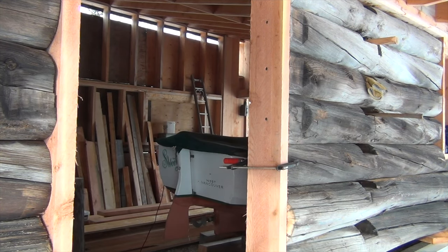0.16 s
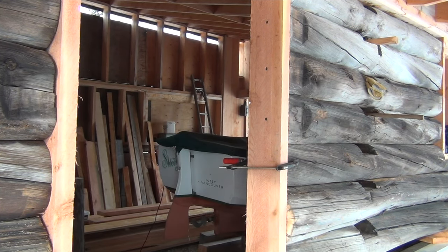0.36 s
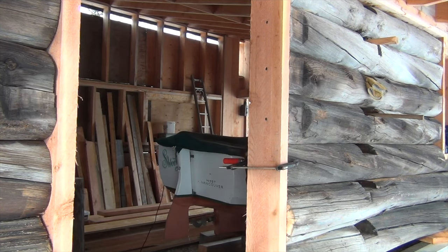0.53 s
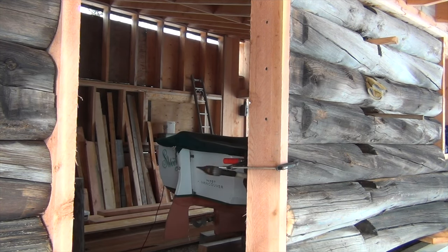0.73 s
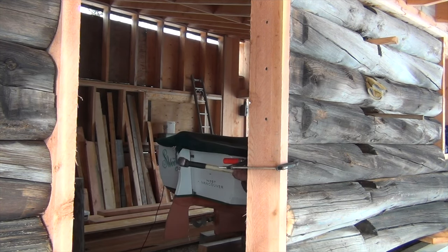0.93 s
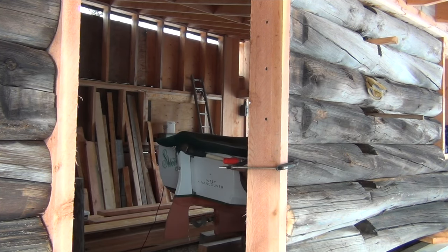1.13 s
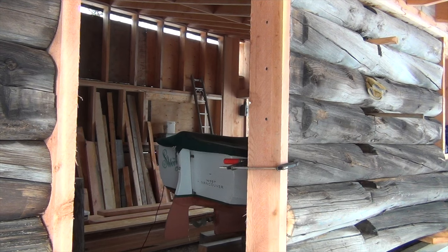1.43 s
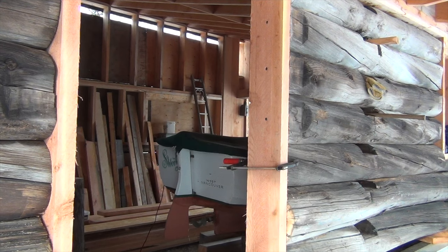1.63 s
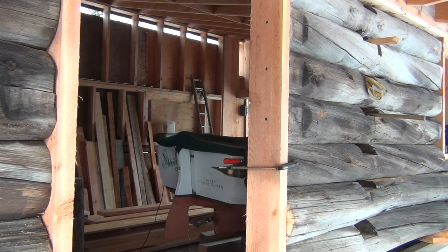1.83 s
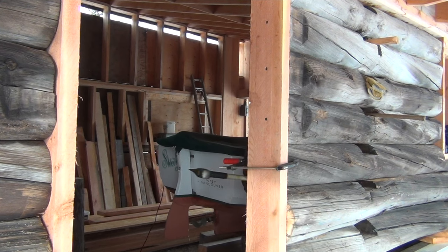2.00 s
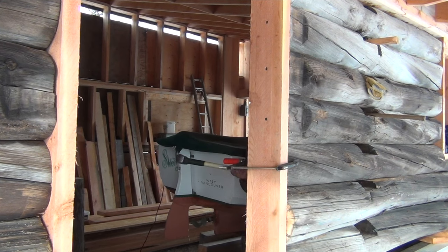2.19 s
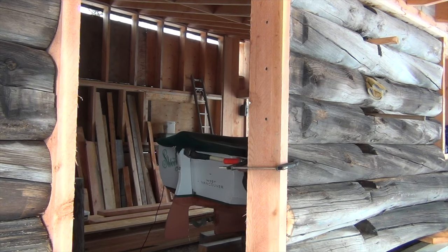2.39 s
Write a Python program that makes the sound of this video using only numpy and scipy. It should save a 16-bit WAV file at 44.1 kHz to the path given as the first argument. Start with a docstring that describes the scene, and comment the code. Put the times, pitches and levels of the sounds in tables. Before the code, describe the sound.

A sledgehammer hits the log wall of a shed twice. Each deep thud leaves the timbers humming and loose things rattling inside. Small clicks, a hollow wooden knock and a faint metallic squeak come between the blows, in quiet outdoor air.

```python
"""Sledgehammer on a log shed

Two blows strike the wall. Each gives a loud thud, held nearly level for a fifth of a second as by a
limiter, then dying away while the timbers hum. Loose things inside rattle, then clatter again as the
wall rocks back. Around the blows: small clicks, one hollow wooden knock, soft scuffs and a thin
squeak, as of metal rubbing."""
import sys
import numpy as np
from scipy.fft import rfft, irfft, next_fast_len
from scipy.io import wavfile
from scipy.ndimage import map_coordinates

SR = 44100
rng = np.random.default_rng(int(sys.argv[2]) if len(sys.argv) > 2 else 0)


def dump(signal):
    """Clip the signal to [-1, 1] and save it as 16-bit WAV at the path in sys.argv[1]."""
    limited = np.clip(np.atleast_2d(signal).T, -1, 1)
    pcm = np.round(limited * 32767).astype(np.int16)
    wavfile.write(sys.argv[1], SR, pcm)


N = 112454
T = np.arange(N) / SR


def amp(db):
    """Decibels to gain."""
    return 10 ** (np.asarray(db) / 20)


def unit_rms(x):
    """Scale to rms 1."""
    return x / np.sqrt(np.mean(x ** 2) + 1e-20)


def log_interp(points, hz):
    """Interpolate (frequency [Hz], value) points on a log axis."""
    freqs, values = np.transpose(points)
    return np.interp(np.log(hz + 1), np.log(freqs + 1), values)


def wobble(rate_hz):
    """Smooth random curve, rate_hz knots a second."""
    return map_coordinates(rng.standard_normal(N // 4), [T * rate_hz], mode="mirror")


def filtered(x, response):
    """Apply a frequency response."""
    size = next_fast_len(N + SR // 4)
    return irfft(rfft(x, size) * response(np.fft.rfftfreq(size, 1 / SR)), size)[..., :N]


# left-right likeness (frequency [Hz], coherence [0..1])
COHERENCE = [(30, 0.86), (130, 0.94), (350, 0.96), (700, 0.9), (1400, 0.94), (2400, 0.92), (4000, 0.94),
             (7000, 0.83), (10500, 0.97), (15000, 1)]

def noise(spectrum, tilt_db=0, coherence=COHERENCE):
    """Coloured stereo noise of rms 1, tilted by tilt_db an octave above about 1 kHz."""
    def colour(hz):
        angle = np.arccos(np.clip(log_interp(coherence, hz), -1, 1)) / 2
        gain = amp(log_interp(spectrum, hz) + tilt_db * np.log2(hz / 1000 + 1))
        return gain * [np.cos(angle), np.sin(angle)]
    mid, side = filtered(rng.standard_normal((2, N)), colour)
    return unit_rms(np.array([mid + side, mid - side]))


def envelope(start_s, attack_s, fall_db_per_s, hold_s=0, sag_db_per_s=0):
    """Attack, sagging hold, exponential release."""
    t = np.maximum(T - start_s, 0)
    drop_db = sag_db_per_s * np.minimum(t, hold_s) + fall_db_per_s * np.maximum(t - hold_s, 0)
    return (1 - np.exp(-t / attack_s)) * amp(-drop_db)


def ring(modes, start_s, attack_s, drift_rad):
    """Damped modes with wandering phase."""
    return sum(amp(db) * envelope(start_s, attack_s, 60 / t60)
               * np.sin(2 * np.pi * (hz * T + rng.random()) + drift_rad * wobble(14))
               for hz, db, t60 in modes)


# hammer blows (time [s], level [dB])
HAMMER_BLOWS = [(0.2045, -21.5), (1.468, -21.5)]
# spectra of hammer crack, wall thud, shed boom (frequency [Hz], relative density [dB])
CRACK_SPECTRUM = [(90, -33), (220, -1), (600, -1), (1000, -3.5), (1500, -12.5), (2500, -23.5), (5000, -31),
                  (9000, -29.5), (12000, -27), (15500, -38)]
THUD_SPECTRUM = [(20, -12), (45, -9), (70, -9.5), (98, -13.5), (125, -1.5), (170, 2.5), (240, 0.5),
                 (310, -5.5), (430, -0.5), (650, -8), (900, -15), (1300, -21.5), (2300, -31.5), (5000, -47),
                 (15000, -57)]
BOOM_SPECTRUM = [(25, -11), (70, -8.5), (100, -4.5), (155, -3.5), (250, -6), (470, -1.5), (650, -9),
                 (1000, -10.5), (2000, -19), (4000, -24.5), (8000, -31), (15000, -52)]
# timber modes (frequency [Hz], relative level [dB], t60 [s])
TIMBER_MODES = [(84.3, -26.5, 3.7), (120, -19, 1.75), (153.5, -18.5, 2.8), (171.6, -12.5, 1.38),
                (229, -21.5, 2.87), (342, -24.5, 2.9), (403, -25, 2.1), (419.7, -10.5, 1.04),
                (434, -19, 2.23), (475, -18, 1.2), (514.5, -18, 2.66), (549, -20.5, 2.3), (743, -46, 2.1),
                (936, -17.5, 1.39)]

def wall():
    """Each blow draws the same answer: crack, held thud, low echo, rock back, timber hum."""
    crack = amp(-2) * noise(CRACK_SPECTRUM) * envelope(0, 0.00034, 300, hold_s=0.006)
    thud = noise(THUD_SPECTRUM) * envelope(0, 0.005, 132, hold_s=0.2, sag_db_per_s=27.5)
    hum = amp(-1) * ring(TIMBER_MODES, 0, attack_s=0.012, drift_rad=0.88)
    echo = amp(-11.5) * noise(BOOM_SPECTRUM, tilt_db=-2.5) * envelope(0, 0.033, fall_db_per_s=28)
    rock_back = amp(-12.5) * noise(BOOM_SPECTRUM, tilt_db=1.5) * envelope(0.4, 0.048, 83.5)
    answer = crack + thud + hum + echo + rock_back
    return sum(amp(db) * np.pad(answer, ((0, 0), (round(s * SR), 0)))[:, :N] for s, db in HAMMER_BLOWS)


# loose things landing (time [s], level [dB])
LANDINGS = [(0.227, -30.5), (0.245, -29), (.268, -29.5), (0.286, -25), (.339, -24.5), (.372, -32.5),
            (.405, -37.5), (0.5895, -36.5), (0.666, -36), (.695, -46), (.745, -46), (.838, -51),
            (1.488, -27), (1.537, -26), (1.556, -34), (1.593, -25), (1.611, -30), (1.66, -30), (1.85, -35),
            (1.934, -37), (1.991, -41), (2.034, -47)]
# their contact spectra (frequency [Hz], relative density [dB])
BUZZ_SPECTRUM = [(1000, -9), (2400, -10), (4000, 2), (6500, -1), (8300, -5), (9800, -5), (12500, -14.5),
                 (14500, -23), (15800, -36)]
CLATTER_SPECTRUM = [(300, -2.5), (550, 5), (900, -2.5), (1600, -3.5), (2500, -7), (3200, 0.5), (4000, -0.5),
                    (5000, -2.5), (5800, -8.5), (7000, -11.5), (8500, -19.5), (10000, -21), (15000, -40)]
# their resonances (frequency [Hz], width [Hz])
LOOSE_RESONANCES = [(3240, 9.7), (3523, 19), (3985, 6.7), (4368, 63), (4586, 33), (4887, 8.7), (5556, 20)]

def rattle():
    """Loose things buzz during each thud, land in ringing clatters and settle a bit brighter."""
    def grain(rate_hz, depth_db):
        return unit_rms(amp(depth_db * wobble(rate_hz)))

    def body(hz):
        peaks = sum(1j * hz * width / (mode_hz ** 2 - hz ** 2 + 1j * hz * width)
                    for mode_hz, width in LOOSE_RESONANCES)
        return 1 + 0.44 * peaks

    swell = sum(amp(db - 15.5) * envelope(s, 0.0032, 199, hold_s=0.17, sag_db_per_s=-15.5)
                for s, db in HAMMER_BLOWS)
    hits = [amp(db) * envelope(s, 0.0045, 227, hold_s=0.0038) for s, db in LANDINGS]
    tails = [amp(db - 12) * envelope(s, 0.015, 91) for s, db in LANDINGS]
    buzz = swell * noise(BUZZ_SPECTRUM) * grain(700, depth_db=1.9)
    clatter = np.linalg.norm(hits, axis=0) * noise(CLATTER_SPECTRUM) * grain(500, depth_db=1.1)
    settle = np.linalg.norm(tails, axis=0) * noise(CLATTER_SPECTRUM, tilt_db=0.5)
    return filtered(buzz + clatter + settle, body)


# wood contact spectrum (frequency [Hz], relative density [dB])
KNOCK_SPECTRUM = [(120, -25), (280, 2), (900, -2), (2100, -4), (3000, -16), (5200, -18.5), (7000, -32),
                  (10000, -36), (15000, -52)]
# hollow wood modes (frequency [Hz], relative level [dB], t60 [s])
HOLLOW_MODES = [(232, -11.5, .3), (328, -2, 0.2), (517, -2.5, 0.26), (658, -2, 0.19), (753, -2.5, 0.13),
                (887, 2.5, .13), (1073, 0, .12), (1277, -0.5, 0.14), (1597, -3, 0.1), (1990, 0.5, 0.054),
                (2265, -24.5, 0.96), (2440, -6, 0.1)]

def knock():
    """Wood on wood: a contact burst and a hollow ring."""
    start_s, attack_s = 1.2785, 0.0038
    burst = noise(KNOCK_SPECTRUM) * envelope(start_s, attack_s, 364, hold_s=0.012)
    return amp(-29) * burst + amp(-31) * ring(HOLLOW_MODES, start_s, attack_s, drift_rad=0.69)


# hard contacts (time [s], level [dB], tilt [dB/octave], snap over tail [dB])
CLICK_HITS = [(.529, -63.5, 1, -6), (.879, -56, -3, -1), (.893, -68, 3, 3), (1.0105, -46, 3.5, 0.5),
              (1.024, -50.5, 6.5, 0), (2.226, -72, 14, -1), (2.3439, -53, -7.5, 5)]
# click spectrum (frequency [Hz], relative density [dB])
CLICK_SPECTRUM = [(400, -6), (1500, -1.5), (4000, -5), (7000, 0), (8800, -1), (10000, 0.5), (11200, -4.5),
                  (13000, -10), (15500, -22)]
# ring of the loudest click (frequency [Hz], level [dB], t60 [s])
PING_MODES = [(6550, -53, 0.3), (9700, -45, 0.1), (10100, -46, 0.096), (10610, -55, .11)]

def clicks():
    """Small hard contacts: a snap and a short gritty tail; the loudest one pings."""
    hits = 0
    for s, db, tilt_db, snap_db in CLICK_HITS:
        snap = amp(snap_db) * envelope(s, 0.0001, fall_db_per_s=3000)
        tail = envelope(s, 0.0003, fall_db_per_s=480)
        hits += amp(db) * noise(CLICK_SPECTRUM, tilt_db) * (snap + tail)
    grit = unit_rms(amp(1.3 * wobble(600)))
    return hits * grit + ring(PING_MODES, start_s=1.0115, attack_s=0.0037, drift_rad=0.8)


# movements (time [s], level [dB], hold [s])
SCUFF_MOVES = [(1.26, -50.5, 0.013), (1.336, -54, 0.123), (1.454, -47, 0.01), (2.32, -58.5, 0.048),
               (2.427, -57.5, 0.011), (2.53, -56.5, .03)]
# scuff spectrum (frequency [Hz], relative density [dB])
SCUFF_SPECTRUM = [(100, -2), (300, 6), (1000, -5.5), (2500, -13), (6000, -28), (15000, -40)]

def scuffs():
    """Soft, dull scuffs of movement around the swings."""
    level = sum(amp(db) * envelope(s, 0.0035, 400, hold_s) for s, db, hold_s in SCUFF_MOVES)
    return level * noise(SCUFF_SPECTRUM)


# squeak path (time [s], lower pitch [Hz], lower level [dB], upper level [dB])
SQUEAK_PATH = [(.68, 6570, -77, -74), (0.749, 6440, -57.5, -68.5), (.95, 6460, -67, -74),
               (1.129, 6550, -66, -80), (1.274, 6530, -70, -83), (1.304, 6500, -61, -52),
               (1.459, 6380, -54.5, -60.5), (1.7, 6350, -67, -79), (2.05, 6450, -74, -75),
               (2.35, 6400, -80.5, -95), (2.48, 6400, -119, -100)]

def squeak():
    """Two thin, rough tones as of rubbing metal, scattered on their way to the ears."""
    def jitter():
        return wobble(260) + 1j * wobble(260)

    def tone(hz, db, waver_hz, roughness):
        shared, per_ear = jitter(), np.array([jitter(), jitter()])
        flutter = 1 + roughness * (shared + 0.6 * per_ear)
        phase = 2 * np.pi * np.cumsum(hz + waver_hz * wobble(200)) / SR
        carrier = np.exp(1j * (phase + np.array([[-0.5], [0.5]])))  # left lags
        return amp(db + 1.8 * wobble(44.73)) * unit_rms(np.real(flutter * carrier))

    times_s, *columns = np.transpose(SQUEAK_PATH)
    lower_hz, lower_db, upper_db = [np.interp(T, times_s, column) for column in columns]
    lower = tone(lower_hz, lower_db, waver_hz=35, roughness=0.54)
    upper = tone(12370, upper_db, waver_hz=44.6, roughness=0.51)
    return (lower + upper) * (T > times_s[0])


# air spectrum (frequency [Hz], relative density [dB])
AIR_SPECTRUM = [(25, -16), (59, 1), (96, 4), (221, 0), (631, -3), (1270, -3), (1750, -10.5), (4040, -15),
                (10000, -18), (15500, -18)]
# its left-right likeness (frequency [Hz], coherence [0..1])
AIR_COHERENCE = [(60, .98), (150, 1), (400, 0.96), (1000, 0.81), (2400, .5), (6000, 0.92), (15000, 0.92)]

def air():
    """Quiet, steady outdoor air."""
    return amp(-63.5) * noise(AIR_SPECTRUM, coherence=AIR_COHERENCE)


# microphone ports (frequency [Hz], left phase lead [rad], left minus right [dB])
MIC_PORTS = [(40, 0.49, 2.5), (132, -0.24, -1.7), (350, -0.71, -1.2), (750, -0.82, -1), (1800, -0.57, -0.9),
             (3780, -0.19, -2), (7000, -0.28, -0.5), (12000, 0, 0.5)]

def scene():
    """All sources; over most of the band they reach the right port a little earlier and louder."""
    def port_response(hz):
        ports, split = np.array(MIC_PORTS), np.array([[0.5], [-0.5]])
        lead_rad = log_interp(ports[:, [0, 1]], hz)
        balance_db = log_interp(ports[:, [0, 2]], hz)
        return np.exp(1j * split * lead_rad) * amp(split * balance_db)
    sources = wall() + rattle() + knock() + clicks() + scuffs() + squeak() + air()
    return filtered(sources, port_response)


def record(dry):
    """Soft clip, then band limit."""
    ceiling, top_hz = 0.2, 15950
    rounded = dry / (1 + np.abs(dry / ceiling) ** 4) ** (1 / 4)
    return filtered(rounded, lambda hz: hz < top_hz)


dry = scene()
out = record(dry)
dump(out)
```